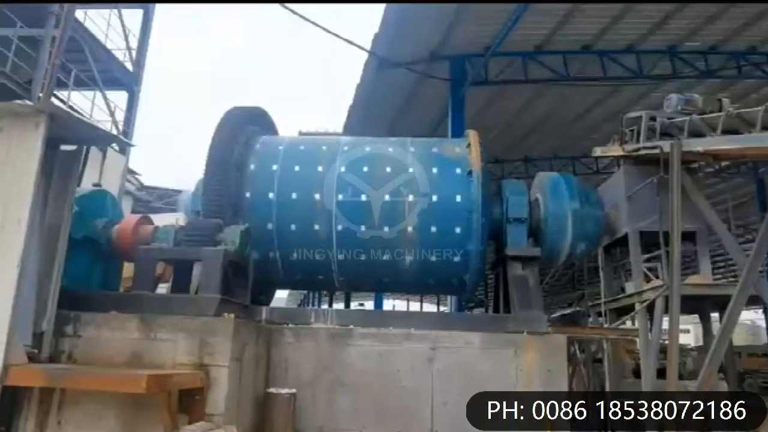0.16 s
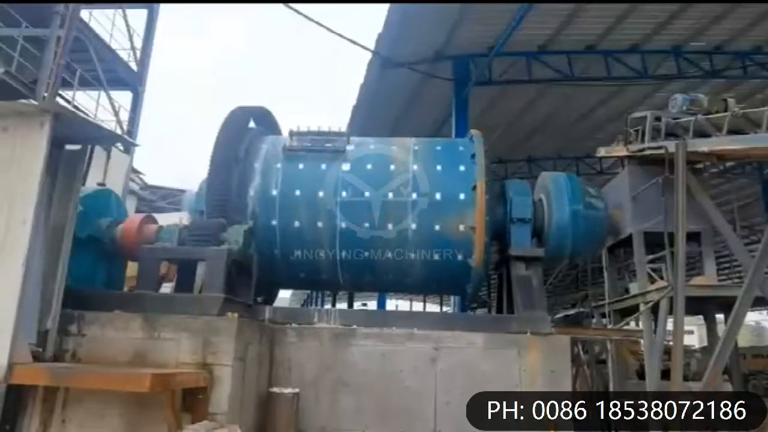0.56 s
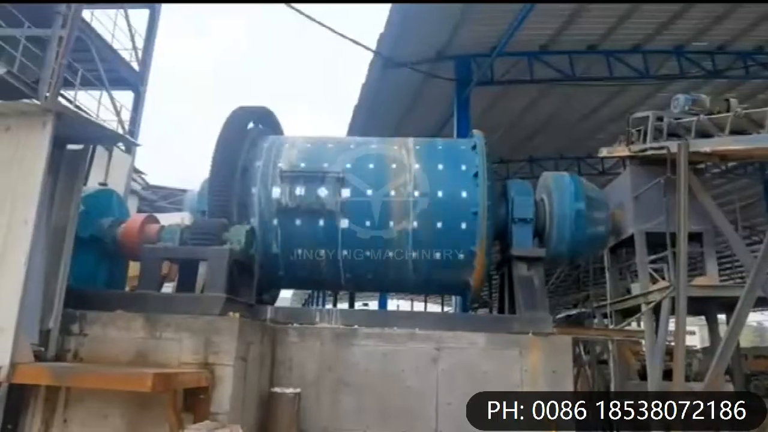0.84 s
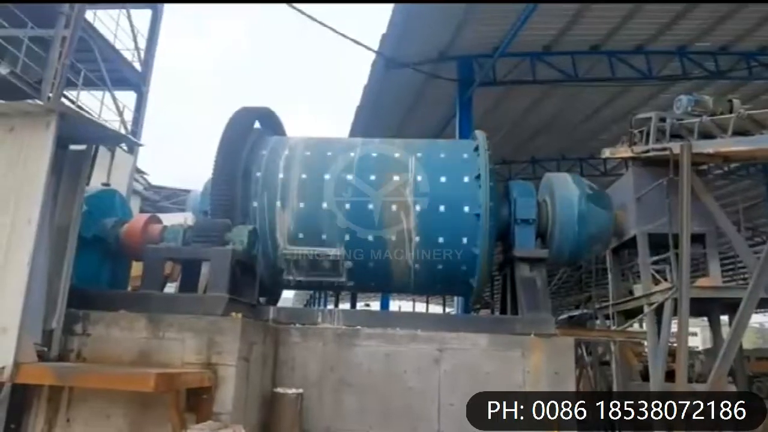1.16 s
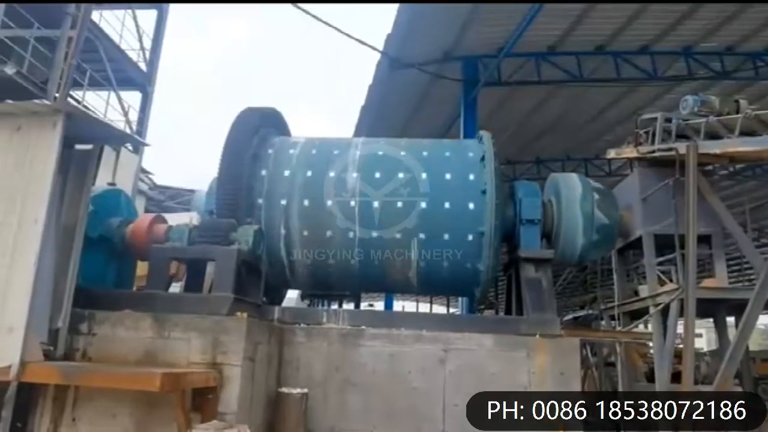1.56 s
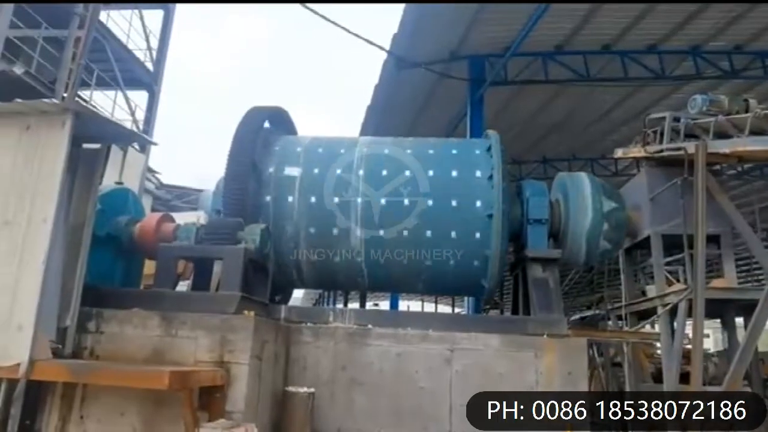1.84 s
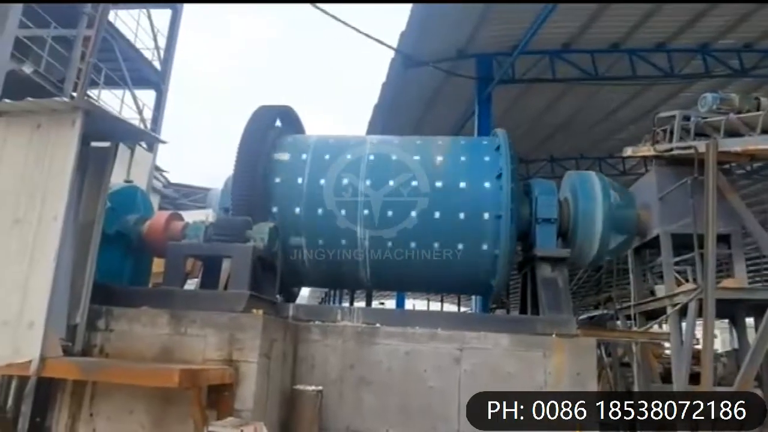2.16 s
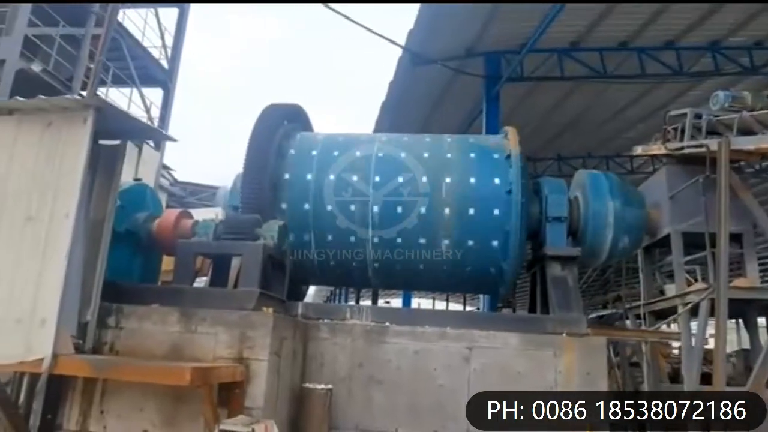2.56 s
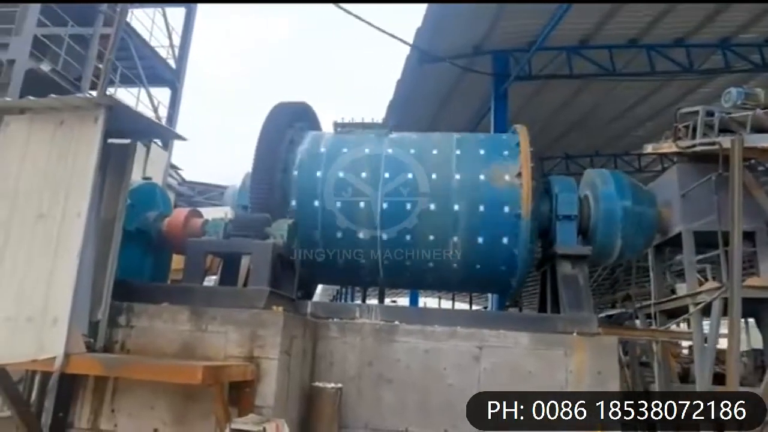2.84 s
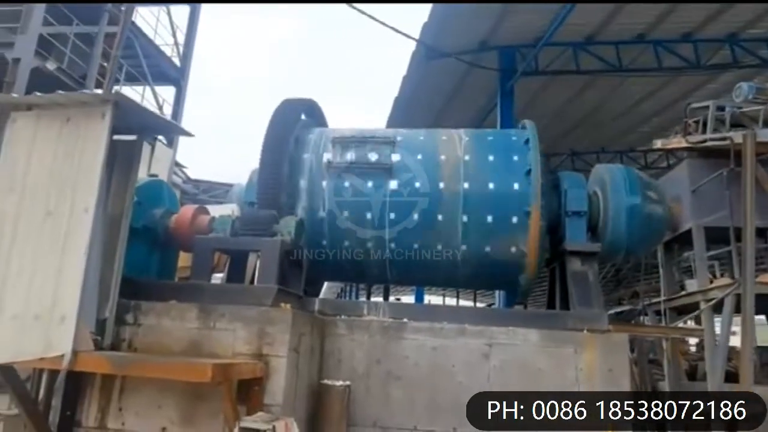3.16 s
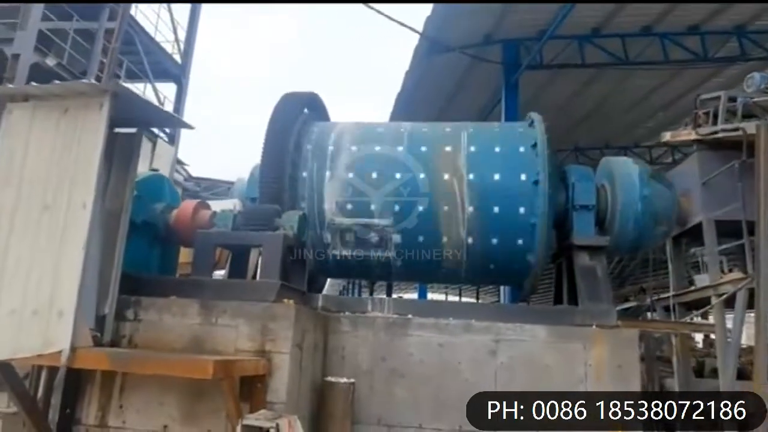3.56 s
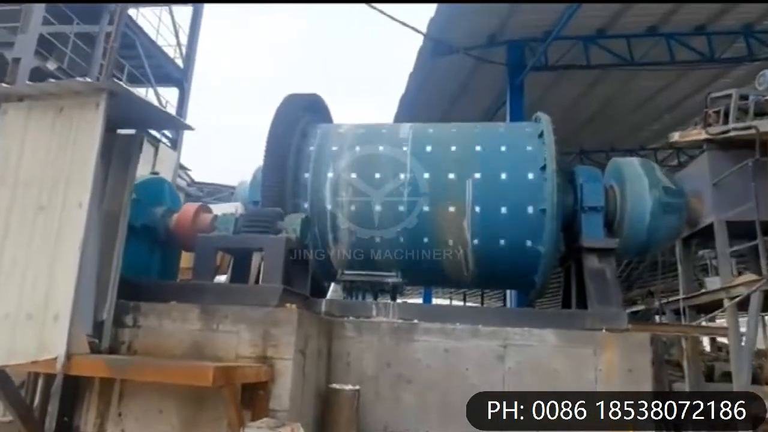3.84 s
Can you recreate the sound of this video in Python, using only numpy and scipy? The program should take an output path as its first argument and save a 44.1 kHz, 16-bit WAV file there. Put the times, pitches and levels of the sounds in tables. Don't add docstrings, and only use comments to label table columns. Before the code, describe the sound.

A ball mill roars steadily in an open industrial shed, steel balls thudding and clanking on its lining, gears humming beneath, heard by a phone a few metres away after a near-silent start.

```python
import sys
import numpy as np
from scipy import signal
from scipy.fft import rfft, irfft
from scipy.io import wavfile
from scipy.ndimage import uniform_filter1d

SR = 44100
rng = np.random.default_rng(int(sys.argv[2]) if len(sys.argv) > 2 else 0)


def gain_from_decibels(decibels):
    exponent = np.asarray(decibels, float) / 20
    return 10 ** exponent


def unload_wav(signal):
    wavfile.write(
        sys.argv[1],
        SR,
        np.round(np.clip(np.atleast_2d(signal).T, -1, 1) * 32767).astype(np.int16),
    )


N = 176400


def times():
    return np.arange(N) / SR


def evened(x):
    return x / np.sqrt(np.mean(x ** 2) + 1e-20)


def coloured(x, points):
    pitch_hz, level_db = np.transpose(points)
    hz = np.fft.rfftfreq(len(x), 1 / SR)
    curve_db = np.interp(np.log(hz + 1), np.log(pitch_hz + 1), level_db, left=-90, right=-90)
    return evened(irfft(rfft(x) * gain_from_decibels(curve_db), len(x)))


def resonate(x, hz, width_hz):
    r = np.exp(-np.pi * max(width_hz, 1) / SR)
    return 2 * signal.lfilter([1 - r], [1, -r * np.exp(2j * np.pi * hz / SR)], x + 1e-15).real


def drift(rate_hz):
    low_pass = signal.butter(2, rate_hz, fs=SR, output="sos")
    return evened(signal.sosfilt(low_pass, rng.standard_normal(N)))


def knocks(per_s, spread_db):
    at, size, sign = rng.random((int(per_s * N / SR), 3)).T
    size_db = spread_db * np.minimum(-np.log(size + 1e-9), 5)
    return np.bincount((at * N).astype(int), np.sign(sign - .5) * gain_from_decibels(size_db), N)


def patchy(x, depth_db, bins, frames):
    z = signal.stft(x, nperseg=512)[2]
    patches = uniform_filter1d(rng.standard_normal(z.shape), bins, 0)
    patches = uniform_filter1d(patches, frames, 1)
    return evened(signal.istft(z * gain_from_decibels(depth_db * evened(patches)), nperseg=512)[1][:N])


# time_s, level_db, tumbling_effort_db
LEVEL = [(0.269, -20, 0), (0.29, -13, -10), (0.67, -16.5, -2), (0.76, -15.5, -15.5), (0.79, -15.5, -8.5),
         (1.74, -15.5, -5.5), (1.809, -15, -15.5), (1.84, -15, -2), (2.52, -18, -9), (2.66, -19.5, -2.5),
         (2.99, -19, -6), (3.03, -18.5, -7), (3.1, -20, 3.5), (3.17, -21, -6.5), (3.32, -20.5, -9),
         (3.46, -21, -16), (3.94, -20.5, -1), (4.0, -19, -12.5)]


def distance(follow):
    time_s, level_db, _ = np.transpose(LEVEL)
    return gain_from_decibels(follow * (np.interp(times(), time_s, level_db) + 17))


# pitch_hz, level_db (per Hz)
ROAR = [(29, -59), (50, -35), (118, -6), (172, -2.5), (310, -2), (371, -7.5), (550, -8.5), (1090, -20),
        (3600, -32.5), (4680, -70), (7920, -120)]
# pitch_hz, width_hz, level_db
SHELL = [(108.6, 26, -5), (198, 100, -5), (214, 47, -3.5), (281.5, 13.5, 1.5), (391, 74, -1), (506, 57, -3),
         (551.6, 50, -0.5), (623.5, 85, -2.5), (702.6, 27, -4.5), (786, 18.7, -7.5), (905, 94, -10)]


def charge():
    time_s, _, effort_db = np.transpose(LEVEL)
    effort = gain_from_decibels(np.interp(times(), time_s, effort_db) + 6)
    roar = patchy(coloured(rng.standard_normal(N), ROAR), 3.8, bins=4, frames=10)
    shell = np.zeros(N)
    for hz, width_hz, db in SHELL:
        hits = knocks(per_s=800, spread_db=2.5)
        ring = evened(resonate(resonate(hits, hz, width_hz), hz, 2 * width_hz))
        shell += gain_from_decibels(db + 1.74 * drift(10.7)) * (effort if hz > 380 else 1) * ring
    return (gain_from_decibels(-23) * roar + gain_from_decibels(-21.5) * evened(shell)) * distance(0.74)


# start_s, length_s, level_db, ring_hz, crack_db
THUDS = [(.251, 0.089, -23, 536, -8), (0.374, 0.052, -21.5, 555, -3.5), (.451, 0.043, -14, 499, -8.5),
         (.615, 0.08, -25, 518, -12), (0.814, 0.026, -22, 521, -2.5), (.68, 0.041, -24, 546.5, -6),
         (.975, 0.062, -23.5, 466, -5.5), (1.256, 0.034, -20, 552, -7), (1.3, 0.088, -22.5, 468, -2),
         (1.454, 0.087, -19, 552.5, -8.5), (1.63, 0.052, -18, 555.5, -4.5), (1.705, 0.077, -22, 550, -5),
         (1.836, 0.13, -20.5, 527, -8.5), (1.923, 0.022, -16, 541, -8.5), (1.981, 0.054, -21.5, 496, -3),
         (2.07, 0.08, -22.5, 468.4, -21), (2.286, 0.022, -18.5, 550, -16), (2.664, .03, -19, 546.4, -4.5),
         (2.682, 0.05, -24.5, 643, 0.5), (2.74, 0.022, -20, 482, -8), (2.876, 0.046, -22, 572, -5),
         (2.932, 0.068, -21, 554.5, -20), (3.08, 0.029, -16, 543, -10), (3.111, 0.011, -12.5, 508, -11),
         (3.228, 0.1, -28, 481, -21), (3.94, 0.025, -27, 583, -6)]


def thuds():
    blows_per_s, width_hz, sag_db = 700, 60, -6.5
    out, t = np.zeros(N + SR), np.arange(SR // 4) / SR
    for start_s, length_s, db, hz, crack_db in THUDS:
        lands = rng.random(len(t)) < blows_per_s / SR
        hits = rng.uniform(0.71, 1, len(t)) * lands * rng.choice([-1., 1.], len(t))
        hits = hits + .06 * np.sin(2 * np.pi * hz * t)
        hits[0] = 0.97 * 1.3
        hits = hits * (t < length_s) * gain_from_decibels(sag_db * t / length_s)
        ring = resonate(resonate(hits, hz, width_hz), hz, 2 * width_hz)
        rattle = rng.standard_normal(len(t)) * np.minimum(t / 0.0098, 1) * np.exp(-(t / length_s) ** 2)
        crack = resonate(resonate(rattle, 760, 400), 820, 480)
        sound = evened(ring) + gain_from_decibels(crack_db - 2.5) * evened(crack)
        out[round(start_s * SR):][:len(t)] += gain_from_decibels(db - 0.5) * np.sqrt(length_s / t[-1]) * sound
    return out[:N]


# start_s, peak_db, ring_hz
BLOWS = [(0.409, -0.5, 554), (0.453, -3, 516), (0.605, -11, 633), (0.813, -8, 516), (0.885, -13, 527),
         (0.976, -17, 456), (1.08, -4.5, 510), (1.179, -12, 463), (1.211, -10, 752), (1.253, -15, 526),
         (1.458, -9, 540), (1.629, -14, 457), (1.641, -6, 575), (1.807, -9, 397), (1.835, -8, 554),
         (1.871, -3, 555), (1.929, -3.5, 539), (1.981, -9, 540), (2.008, -21, 498), (2.254, -11, 546),
         (2.293, -8, 550), (2.361, -8, 405), (2.406, -13, 462), (2.482, -16, 537), (2.666, -6.5, 595),
         (2.821, -10, 570), (2.894, -9.5, 604), (3.023, -20, 584), (3.062, -11, 533), (3.084, -7, 546),
         (3.113, -10, 510), (3.185, -11, 463), (3.228, -8.5, 580), (3.279, -18, 482), (3.349, -9.5, 535),
         (3.416, -23, 574), (3.517, -14, 506), (3.596, -13, 540), (3.623, -22, 573), (3.823, -16, 455),
         (3.941, -10, 550)]


def blows():
    fade_s = 0.059
    out, t = np.zeros(N + SR), np.arange(SR // 8) / SR
    for start_s, db, hz in BLOWS:
        ring = gain_from_decibels(-60 * t / fade_s) * np.sin(2 * np.pi * hz * t)
        clank_hz = hz * 1.7 * rng.uniform(0.97, 1.2)
        clank = gain_from_decibels(-13.5 - 120 * t / fade_s) * np.sin(2 * np.pi * clank_hz * t)
        out[round(start_s * SR):][:len(t)] += gain_from_decibels(db - 3) * np.minimum(t / 0.0026, 1) * (ring + clank)
    return out[:N]


# start_s, peak_db, pitch_hz
THUMPS = [(0.324, -14, 261), (0.437, -19, 249), (0.622, -16, 283), (0.658, -18, 258), (0.775, -10, 258),
          (0.851, -13, 278), (0.976, -20, 253), (1.021, -10, 250), (1.177, -10.5, 264), (1.273, -26, 283),
          (1.369, -15, 269), (1.398, -18, 275), (1.461, -13, 249), (1.576, -11, 276), (1.661, -22, 272),
          (1.742, -8.5, 264), (2.104, -13, 240), (2.523, -24, 280), (2.696, -7.5, 277), (2.747, -13, 264),
          (2.873, -9, 269), (3.089, -11.5, 243), (3.215, -13.5, 177), (3.309, -16, 191),
          (3.387, -15.5, 264), (3.675, -15, 266)]


def thumps():
    rise_s, fade_s = 0.0055, 0.051
    out, t = np.zeros(N + SR), np.arange(SR // 5) / SR
    shape = (1 - np.exp(-t / rise_s)) * gain_from_decibels(-60 * t / fade_s)
    for start_s, db, hz in THUMPS:
        ring = shape / shape.max() * np.sin(2 * np.pi * hz * t)
        out[round(start_s * SR):][:len(t)] += gain_from_decibels(db - 2.5) * ring
    return out[:N]


# pitch_hz, level_db, waver_hz
HUM = [
    (64.6, -40, 3),
    (130.1, -30, 6.8),
    (192.7, -34.5, 28),
    (254.8, -29.5, 11.96),
    (322, -23, 4.88),
    (456, -34, 9.2),
    (960, -42.5, 14),
]
# time_s, tooth_tone_db
LOAD = [(0.27, -20), (0.38, -18), (0.46, -33), (0.49, -21.5), (1.47, -23.5), (1.57, -32.5), (1.6, -23.5),
        (1.71, -33), (1.77, -18), (1.94, -34), (1.98, -23), (2.61, -23.5), (2.65, -30), (2.84, -20.5),
        (3.13, -34), (3.28, -23.5), (3.4, -34), (4.0, -27.5)]


def gear():
    time_s, load_db = np.transpose(LOAD)
    load = gain_from_decibels(0.83 * (np.interp(times(), time_s, load_db) + 23.5))
    out = np.zeros(N)
    for line_hz, db, waver_hz in HUM:
        hz = line_hz + 0.396 * waver_hz * drift(13.8)
        strength = np.sqrt(2) * gain_from_decibels(db + 1.4 * drift(11))
        tone = strength * np.cos(2 * np.pi * np.cumsum(hz) / SR)
        out += tone * (load if 240 < line_hz < 340 else distance(0.83))
    return out


# pitch_hz, level_db (per Hz)
PATTER = [(820, -14.5), (1400, -3), (1530, -8), (2620, -3.5), (3020, -8), (3230, -9), (6200, -1),
          (8850, -6.5), (10100, -15), (13100, -53), (22000, -120)]
# start_s, peak_db, fade_s (to fall 60 dB), rise_s
CASCADES = [(0.2844, -26, 0.19, .02), (0.3787, -18, 0.14, .015), (0.6574, -16, 0.35, 0.022),
            (1.2994, -23, 0.27, .02), (1.474, -13, 0.16, .015), (1.7616, -17.5, 0.22, .02),
            (1.9819, -14, 0.12, .012), (2.118, -16, 0.44, 0.023), (2.487, -13, 0.34, 0.0034),
            (2.7294, -27, 0.13, .02), (2.861, -18, 0.2, 0.014), (2.9446, -24.5, 0.19, 0.0089),
            (3.225, -18, 0.13, 0.014), (3.5927, -22, 0.35, 0.01), (3.8213, -18, 0.11, 0.014),
            (3.971, -20, 0.23, .008)]
# pitch_hz, level_db (per Hz)
SPILL = [(900, -19.5), (1600, -1), (2600, -9), (3600, -10), (5500, -3.5), (8400, -4.5), (10100, -14.5),
         (13100, -52)]


def patter():
    fizz = patchy(coloured(rng.standard_normal(N), PATTER), 1.47, bins=10, frames=8)
    pings = coloured(knocks(per_s=3000, spread_db=2.7), PATTER)
    steady = (gain_from_decibels(-33 + 0.32 * drift(4.3)) * fizz + gain_from_decibels(-42) * pings) * distance(1.31)
    t, power = times(), np.zeros(N)
    for start_s, db, fade_s, rise_s in CASCADES:
        fall_db = 60 * np.maximum(t - start_s, 0) / max(fade_s, .03)
        rise = np.clip((t - start_s) / max(rise_s, .003), 0, 1)
        power += gain_from_decibels(db - 9 - fall_db) ** 2 * rise
    spill = patchy(coloured(rng.standard_normal(N), SPILL), 0.72, bins=8, frames=6)
    return steady + np.sqrt(power) * spill


def chimes():
    fade_s = .06
    width_hz = np.log(1000) / np.pi / fade_s
    rings = np.zeros(N)
    for hz in np.geomspace(1100, 8800, num=30) * rng.uniform(0.98, 1.03, size=30):
        rings += resonate(knocks(per_s=6, spread_db=2.15), hz, width_hz)
    return gain_from_decibels(-42) * coloured(rings, PATTER) * distance(1.31)


# start_s, length_s, level_db
WHINE = [
    (.27, .09, -40),
    (1.355, .04, -39),
    (1.41, .17, -44),
    (1.6, .07, -40),
    (1.7, .06, -41),
    (2.5, .1, -46),
    (3.03, .07, -48),
    (3.243, .345, -45.5),
    (3.605, .085, -46.5),
    (3.85, .1, -50),
]


def whine():
    t, level = times(), gain_from_decibels(-57)
    for start_s, length_s, db in WHINE:
        from_edge_s = np.minimum(t - start_s, start_s + length_s - t)
        level = level + gain_from_decibels(db) * np.clip(from_edge_s / .012, 0, 1)
    return np.sqrt(2) * level * gain_from_decibels(0.9 * drift(15.0)) * np.sin(2 * np.pi * 2131.5 * t)


# pitch_hz, level_db (per Hz)
WIND = [(8.8, -54), (25, -30.5), (49, -5), (68, 0), (92, -7), (110, -5), (140, -25.5), (240, -120)]
# time_s, level_db
GUSTS = [(0.27, -45), (0.35, -42), (0.54, -45), (0.57, -38), (0.86, -33), (0.93, -34), (1.07, -38),
         (1.86, -37.5), (2.09, -68), (2.18, -68), (3.93, -58), (4.0, -54)]


def wind():
    time_s, gust_db = np.transpose(GUSTS)
    level_db = 6 + np.interp(times(), time_s, gust_db) + 0.92 * drift(5.4)
    return gain_from_decibels(level_db) * coloured(rng.standard_normal(N), WIND)


def scene():
    mill = charge() + thuds() + blows() + thumps() + gear() + patter() + chimes() + whine()
    thin = signal.sosfilt(signal.butter(3, 82, "high", fs=SR, output="sos"), mill)
    cut = np.clip((times() - 1.93) / 0.037, 0, 1)
    return (mill * (1 - cut) + thin * cut + wind())[None]


def top_cut(x):
    return signal.sosfilt(signal.butter(12, 15000, fs=SR, output="sos"), x)


def record(dry):
    start_s, open_s, recover_db_per_s = .2495, 0.0032, 45
    t = times()
    power_db = 10 * np.log10(abs(uniform_filter1d(dry[0] ** 2, 600)) + 1e-12)
    fall_db = t * recover_db_per_s
    held_db = np.maximum.accumulate(power_db + fall_db) - fall_db
    over_db = np.maximum(held_db + 11.5, 0)
    x = dry / gain_from_decibels(0.59 * uniform_filter1d(over_db, 300))
    lead_in = gain_from_decibels(-38 + 900 * np.minimum(t - start_s, 0)) * (t > .222)
    x = x * np.maximum(np.clip((t - start_s) / open_s, 0, 1), lead_in)
    mix = 0.79 * np.tanh(x / 0.83)
    return top_cut(mix)


dry = scene()
out = record(dry)
unload_wav(out)
```